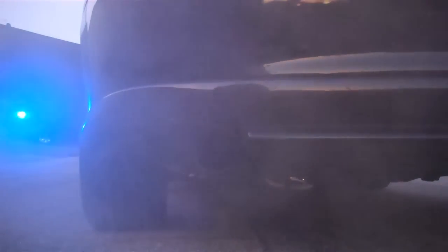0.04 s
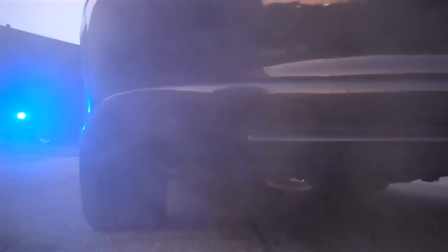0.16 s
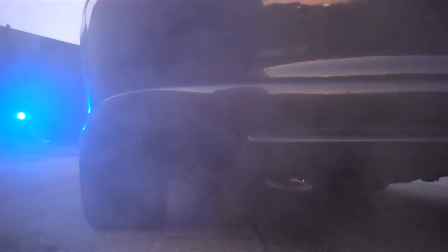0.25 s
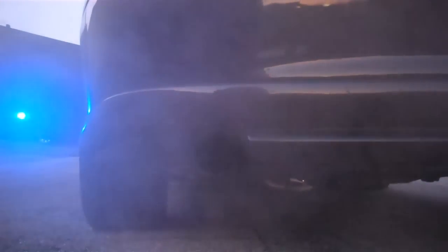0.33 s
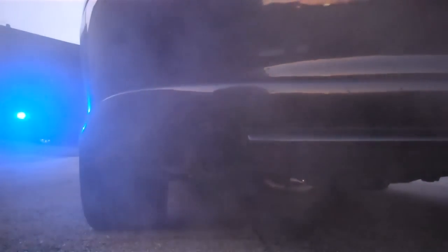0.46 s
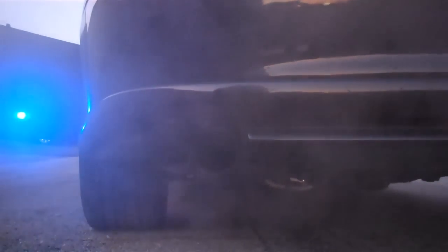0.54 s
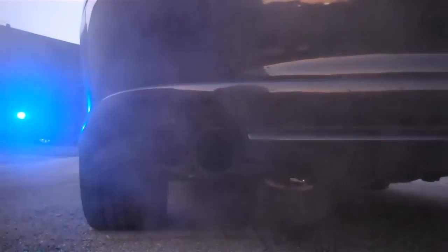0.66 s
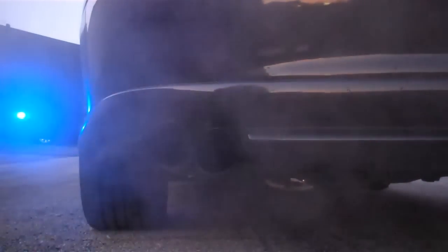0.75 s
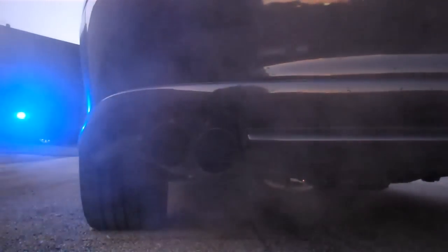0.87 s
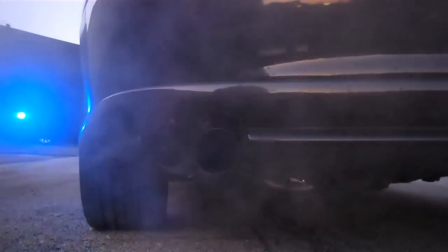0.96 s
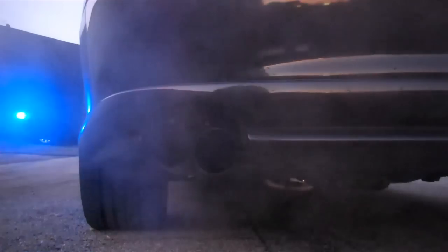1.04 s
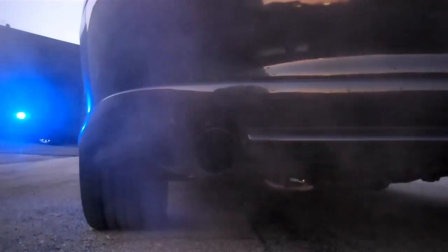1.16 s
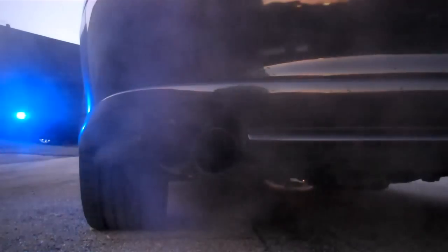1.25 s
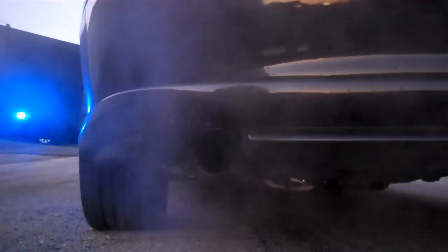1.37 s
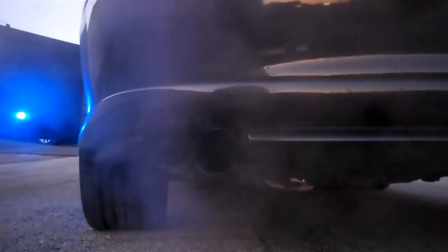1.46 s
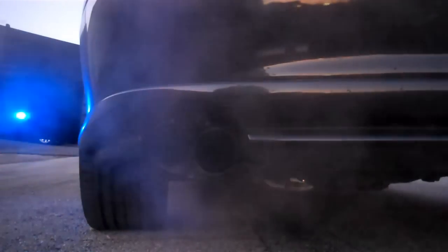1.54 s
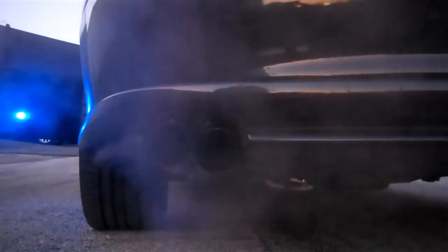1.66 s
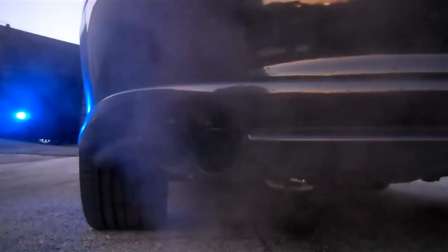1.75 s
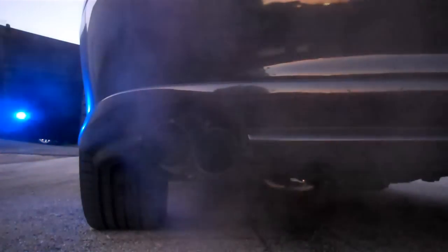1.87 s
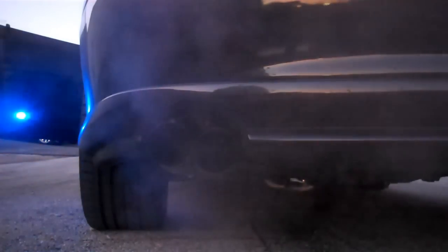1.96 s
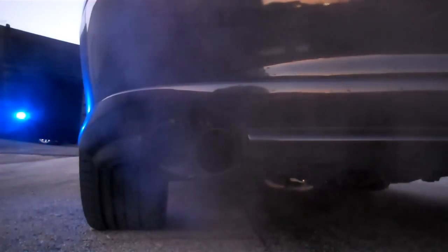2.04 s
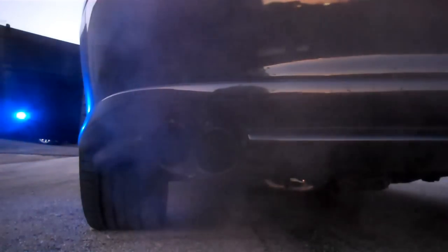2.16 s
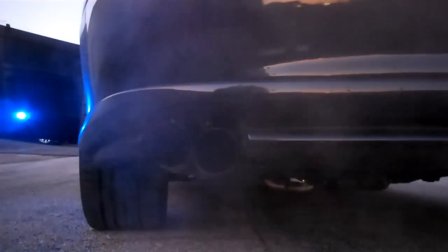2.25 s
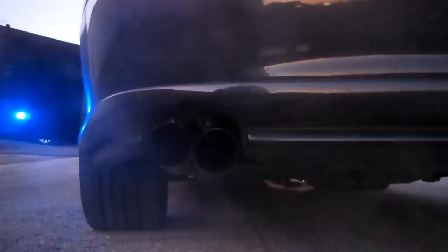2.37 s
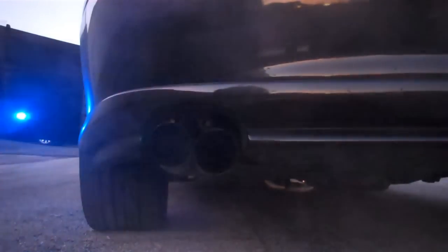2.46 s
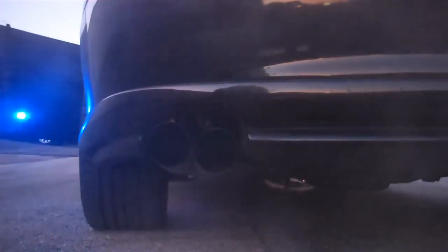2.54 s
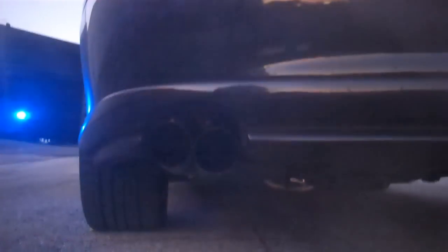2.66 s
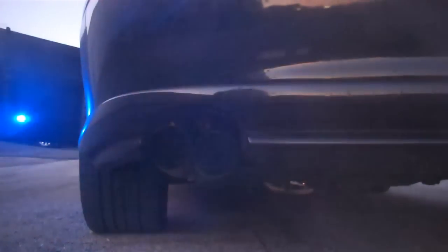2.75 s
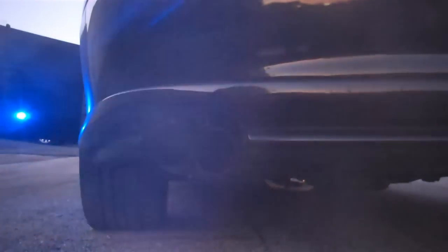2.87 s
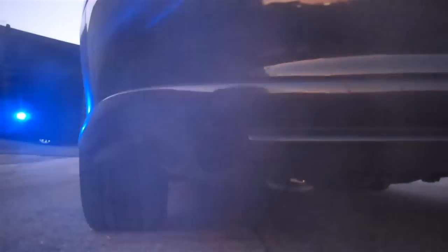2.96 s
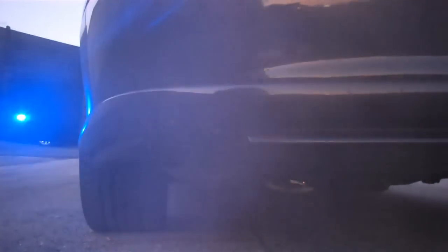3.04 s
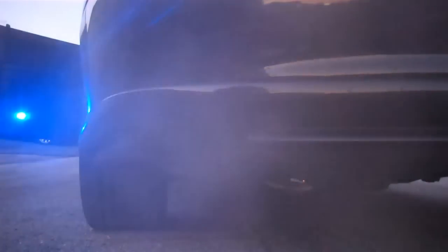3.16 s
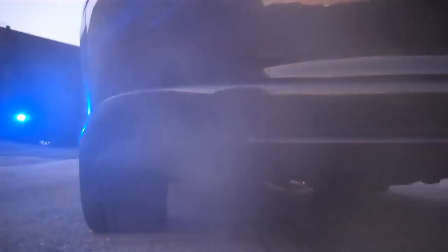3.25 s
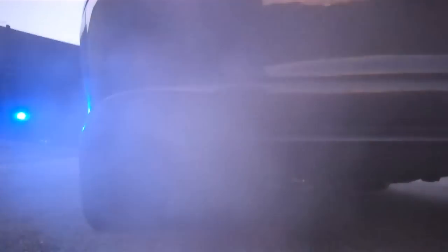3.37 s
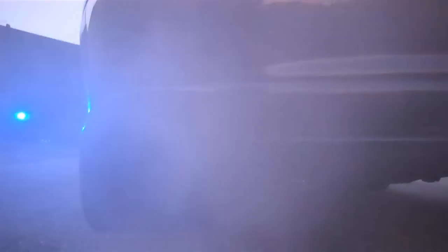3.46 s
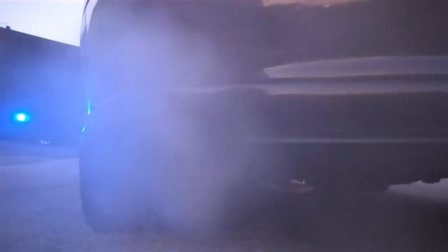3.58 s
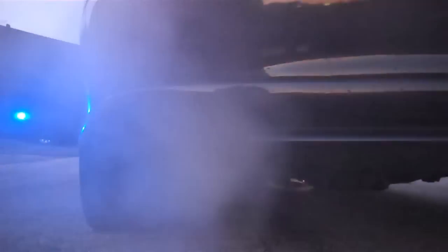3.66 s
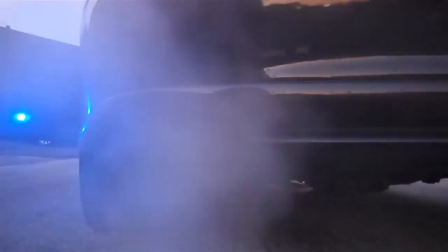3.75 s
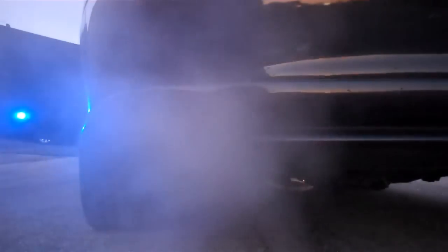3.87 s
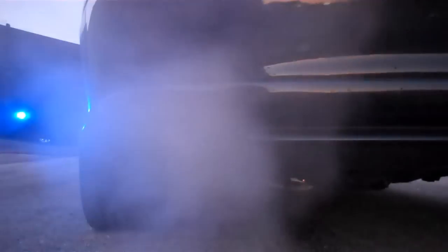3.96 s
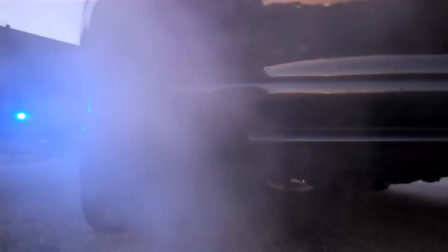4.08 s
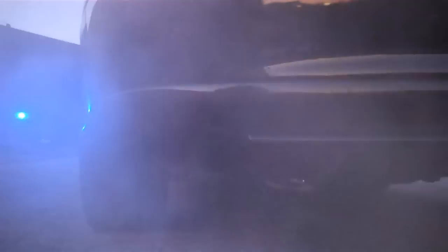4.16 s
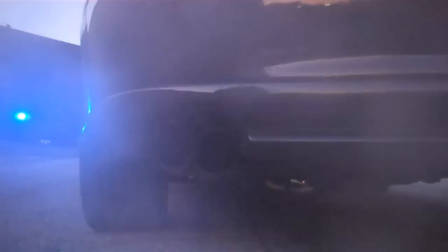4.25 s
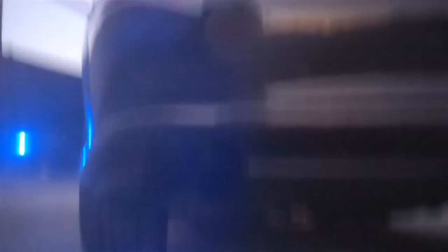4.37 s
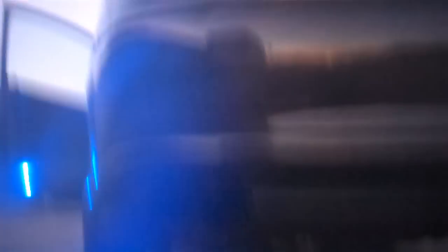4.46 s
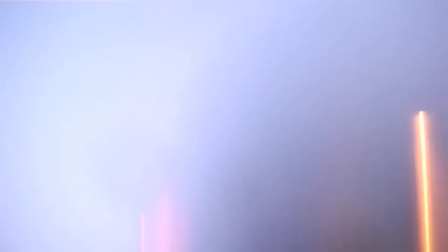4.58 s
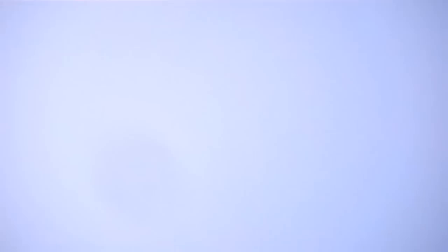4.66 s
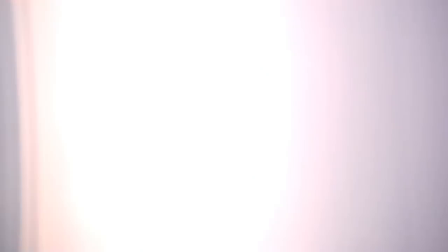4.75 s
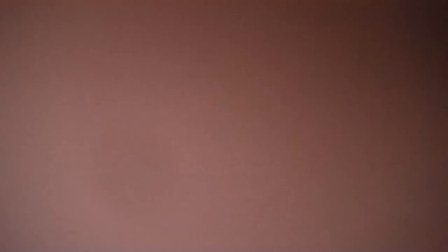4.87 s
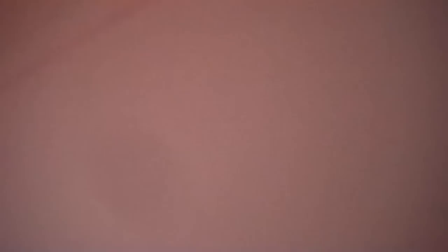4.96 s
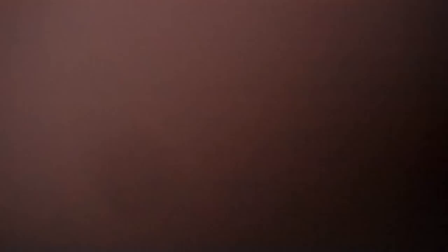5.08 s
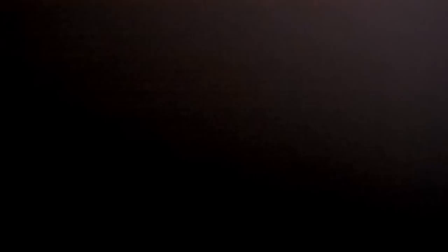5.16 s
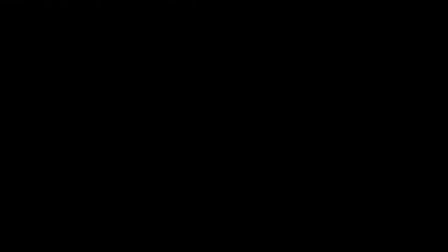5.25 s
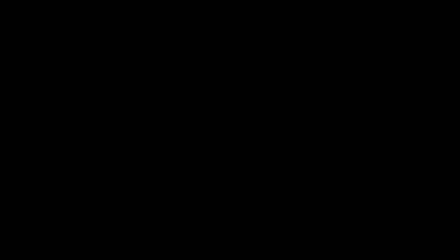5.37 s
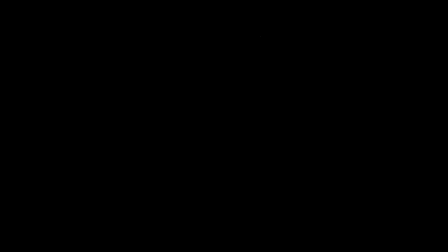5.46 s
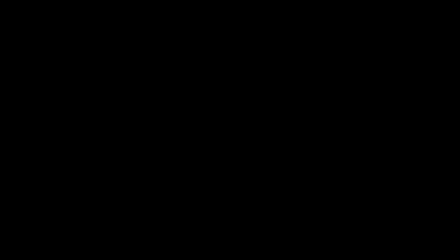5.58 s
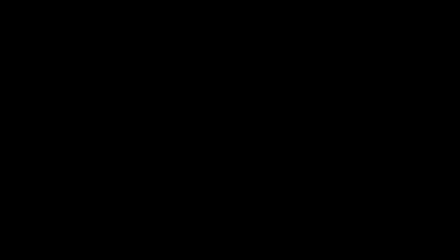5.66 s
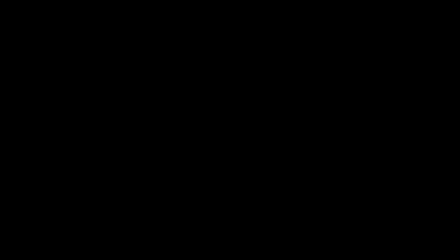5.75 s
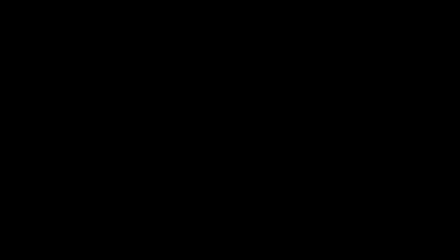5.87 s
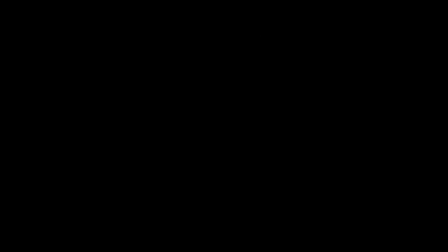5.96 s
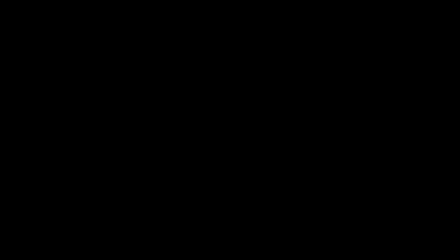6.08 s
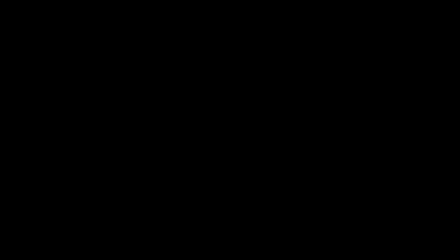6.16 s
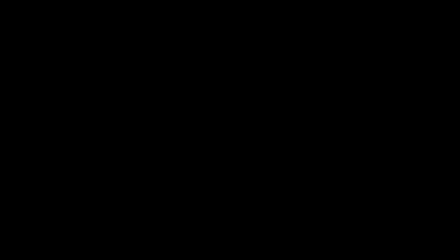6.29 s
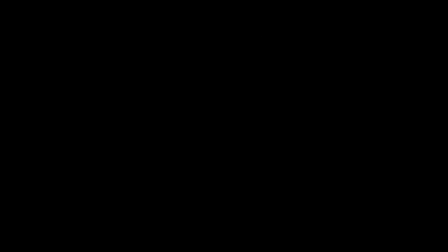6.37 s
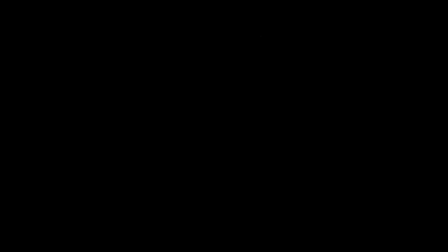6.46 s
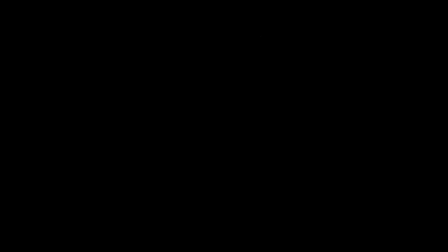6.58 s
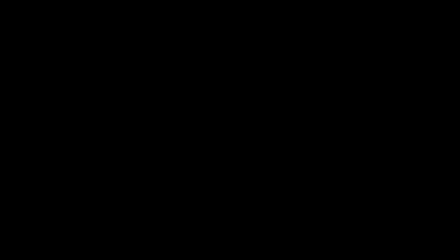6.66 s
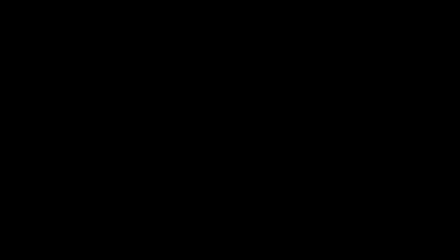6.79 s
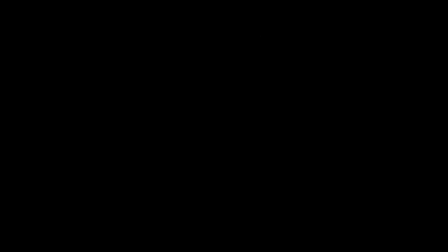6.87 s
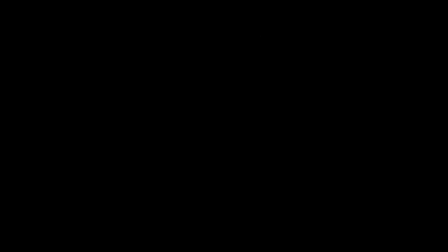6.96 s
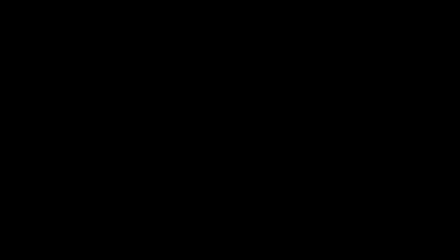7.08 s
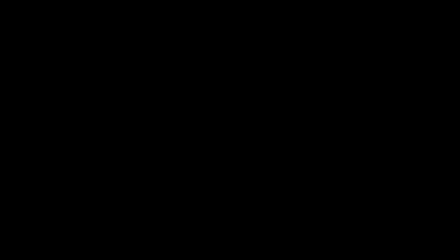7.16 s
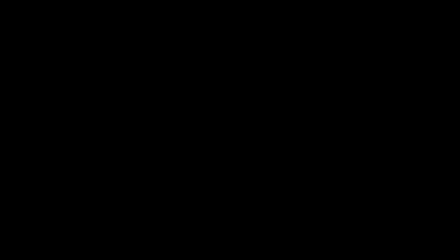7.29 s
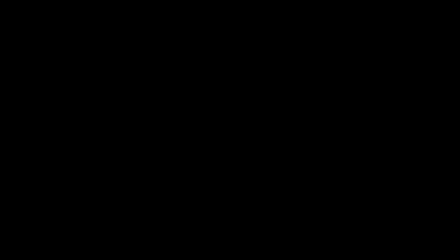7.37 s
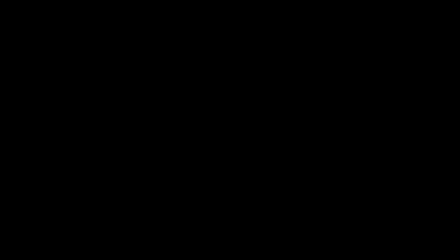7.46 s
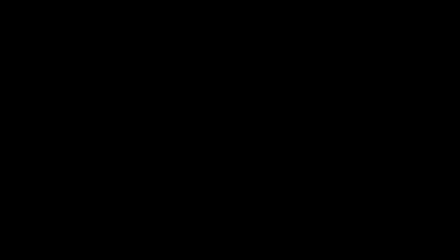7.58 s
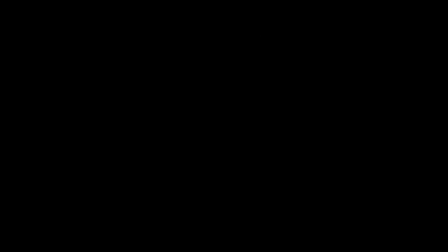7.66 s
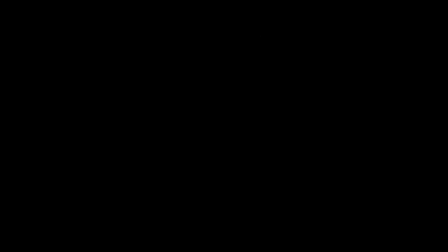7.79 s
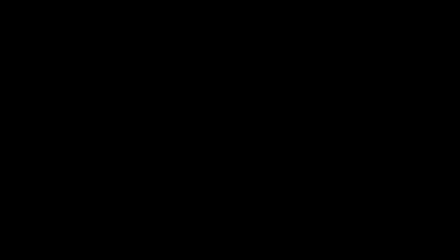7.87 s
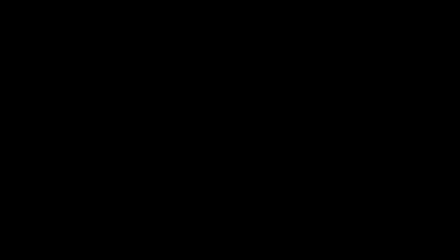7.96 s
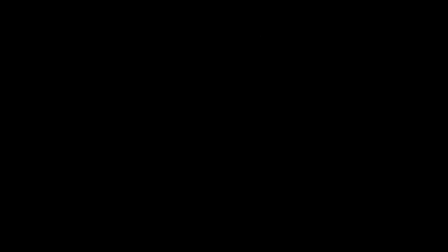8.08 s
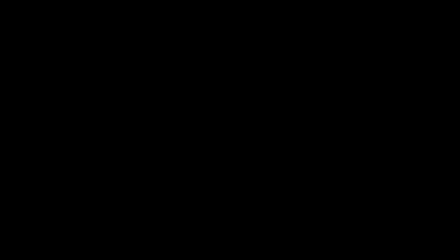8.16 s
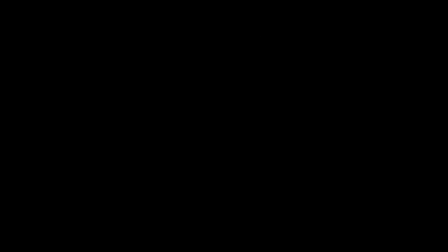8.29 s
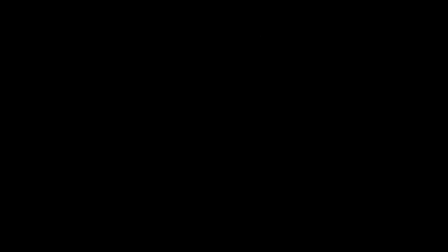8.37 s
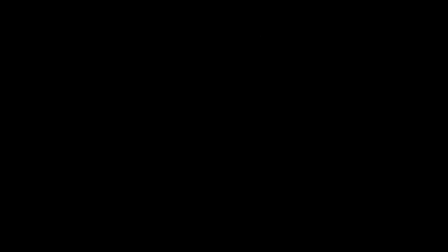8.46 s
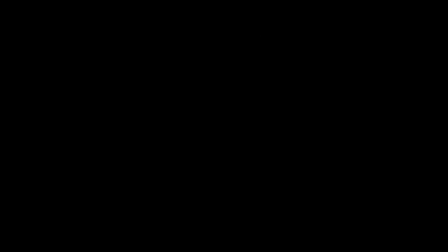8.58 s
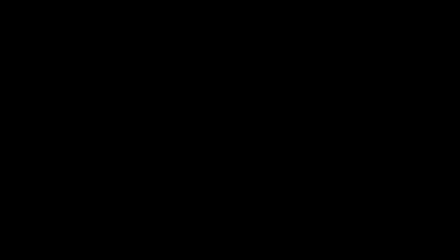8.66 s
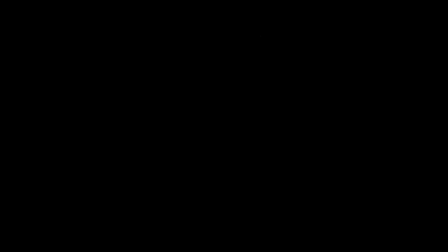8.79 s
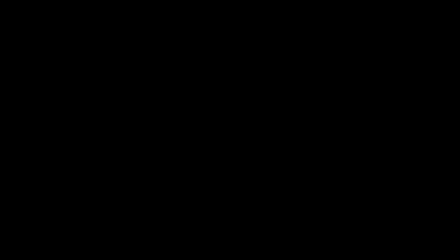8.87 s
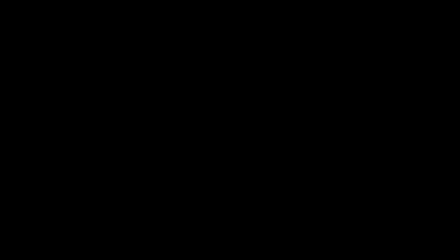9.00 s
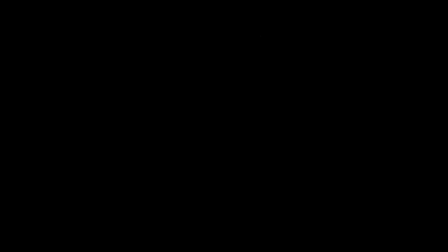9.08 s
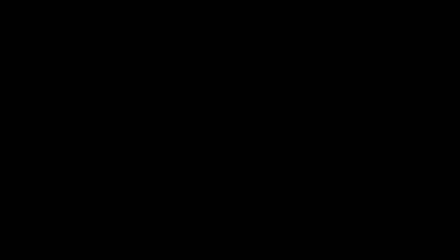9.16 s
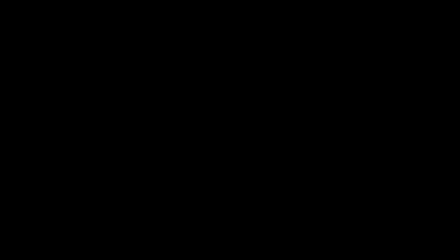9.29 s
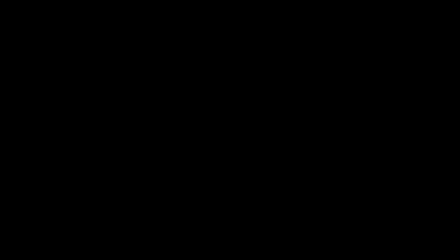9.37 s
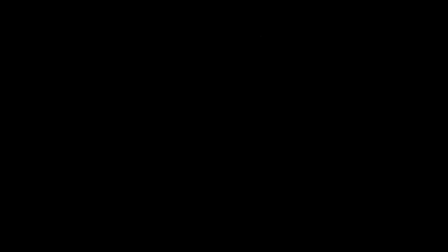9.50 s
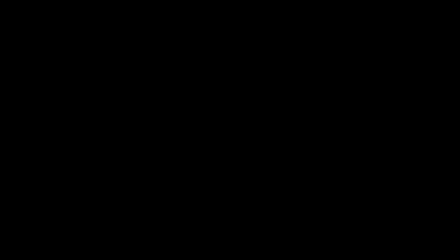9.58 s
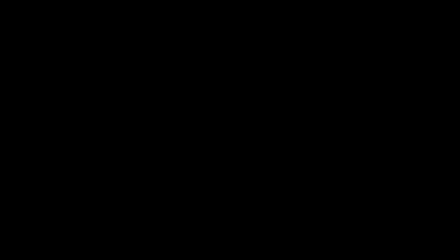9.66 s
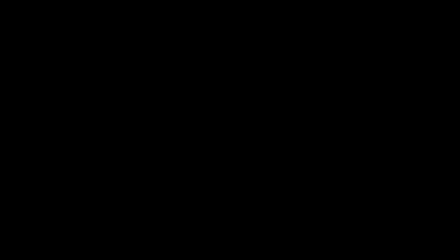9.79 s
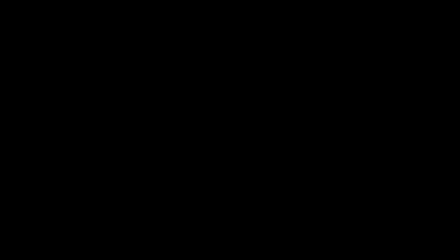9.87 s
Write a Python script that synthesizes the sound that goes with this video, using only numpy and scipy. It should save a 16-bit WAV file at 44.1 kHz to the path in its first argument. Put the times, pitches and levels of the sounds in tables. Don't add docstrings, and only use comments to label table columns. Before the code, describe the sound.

Heard close behind a car's tailpipes outdoors, a V8 idles deeply with breathy hiss and rapid belt chirps. A short blip falls back with pops, then two strong revs climb into a pitched rasp. Fingers scrape and knock the hand-held camera as it turns away and is half covered, dulling the hiss. A long, lumpy, popping coast-down ends in a quieter low idle.

```python
import sys
import numpy as np
from scipy import signal
from scipy.fft import rfft, irfft, next_fast_len
from scipy.io import wavfile
from scipy.ndimage import uniform_filter1d

SR = 44100
rng = np.random.default_rng(int(sys.argv[2]) if len(sys.argv) > 2 else 0)


def volts_from_db(level):
    exponent = np.asarray(level, float) / 20
    return 10 ** exponent


def dump(signal):
    limited = np.clip(np.atleast_2d(signal).T, -1, 1)
    pcm = np.round(limited * 32767).astype(np.int16)
    wavfile.write(sys.argv[1], SR, pcm)


N = 437913

# hz, correlation
ALIKE = [(60, 0.5), (130, 0.98), (290, 1.0), (630, 1), (1390, 1), (3050, 0.79), (6700, 0.45), (14700, 0.0)]
IDLE_HZ = 6.2
LUMPY_FULL_HZ = 18


def unit(x):
    return x / np.sqrt(np.mean(x ** 2) + 1e-20)


def along(points, hz):
    f, v = np.transpose(points)
    return np.interp(np.log(hz + 1), np.log(f + 1), v)


def curves(*tables):
    s, *cols = np.vstack(tables).T
    return [np.interp(np.arange(N) / SR, s, c) for c in cols]


def coloured(x, points):
    m = 2 * next_fast_len(N // 2 + SR // 4)
    gain = volts_from_db(along(points, np.fft.rfftfreq(m, 1 / SR)))
    cep = irfft(np.log(gain + 1e-6), m)
    cep[1:m // 2] *= 2
    cep[m // 2 + 1:] = 0
    return irfft(rfft(x, m) * np.exp(rfft(cep)), m)[..., :N]


def rush(spectrum, alike, lean=1):
    # hz, left_minus_right_db
    lean_points = [(60, 2), (110, -0.5), (200, -9), (380, -0.5), (690, 0), (1280, -1), (2350, 0.5),
                   (4330, -4.5), (7980, 3.5), (14700, 34)]
    hz = np.fft.rfftfreq(N, 1 / SR)
    turn = np.arccos(np.clip(along(alike, hz), -1, 1)) / 2
    a, b = rfft(rng.standard_normal((2, N))) * volts_from_db(along(spectrum, hz))
    mid, side = a * np.cos(turn), b * np.sin(turn)
    tilt = volts_from_db(lean * along(lean_points, hz) / 2)
    return unit(irfft([(mid + side) * tilt, (mid - side) / tilt], N))


def bursts(events, spectrum, rise, t60):
    out, t = np.zeros((2, N + SR)), np.arange(SR // 10) / SR
    for s, db in events:
        out[:, round(s * SR):][:, :len(t)] += volts_from_db(db - 60 * t / t60) * (1 - np.exp(-t / rise))
    return out[:, :N] * rush(spectrum, ALIKE)


def speed():
    # start_s, four_stroke_cycle_hz
    speed_points = [(1.8, 6.6555), (2, 7.31), (2.35, 14.21), (2.52, 18.9), (3.46, 11.68), (3.92, 9.25),
                    (4.06, 10.18), (4.23, 17.58), (4.48, 34.32), (4.59, 37.6), (5.17, 29.5), (5.39, 39.9),
                    (5.5, 44.04), (5.58, 45.57), (5.75, 43.92), (8.35, 9.84), (8.9, 6.6), (9.9, 4.9)]
    friction_hz = 20
    s, hz = np.transpose(speed_points)
    return np.exp(np.interp(np.arange(N) / SR, s, np.log(hz + friction_hz))) - friction_hz


def fast(cycle_hz):
    return np.clip((cycle_hz - 20) / 8, 0, 1)


def whine():
    # pitch_hz, level_db
    electric = [(11806, -66.5)]
    # pitch_hz, level_db
    drive = [(1513, -51.5), (1615, -52), (1782, -73)]
    (hz, db), t = electric[0], np.arange(N) / SR
    thin = volts_from_db(db - 8) * np.clip((t - 8.6) / .3, 0, 1) * np.sin(2 * np.pi * hz * t)

    def drift():
        return np.interp(t, np.arange(400) / 40, rng.standard_normal(400))

    whir = sum(volts_from_db(db + 5.5 + 4.9 * drift()) * np.sin(2 * np.pi * hz * t + 0.31 * drift())
               for hz, db in drive)
    return thin + whir * np.clip((2.1 - t) / 0.27, 0, 1)


def ticks():
    # start_s, peak_db
    tick_events = [(9.5083, -26), (9.5516, -32), (9.6225, -24), (9.6889, -31)]
    spectrum = [(1000, -52), (2000, 12), (4500, 8), (6500, -23), (9000, -70)]
    return bursts(tick_events, spectrum, rise=0.0022, t60=0.045)


def clicks():
    # start_s, peak_db
    click_events = [(4.3514, -33), (4.3695, -29), (4.3874, -28), (4.4677, -27), (4.4844, -28),
                    (4.4897, -25), (4.4984, -27), (4.6309, -34)]
    spectrum = [(5000, -40), (7500, 7), (11500, -12), (14000, -25)]
    return volts_from_db(0.5) * bursts(click_events, spectrum, rise=0.0006, t60=0.019)


def handling():
    # start_s, peak_db, thud_db, left_minus_right_db, length_ms
    knocks = [(4.2193, -32, -11.5, 8.5, 4.8), (4.3539, -19, -9, -7, 8.4), (4.401, -13.5, -7.5, -5.5, 7.1),
              (4.527, -18.5, 15.5, -7, 8.4), (4.6482, -23, -7.5, -3.5, 16), (4.839, -11, 4.5, -4.5, 14),
              (4.8517, 1.5, 11, -6.5, 9), (4.8852, -15.5, -3.5, 1.5, 3), (5.0645, -6.5, -27, -5, 11),
              (5.13, -11.5, -29, 5.5, 27.5), (5.1725, -14, 0.5, 6, 11), (5.2216, -16.5, -16.5, -3.5, 2),
              (5.259, -23, -7.5, 0.5, 17), (5.291, -22.5, -4.5, 3, 6.8), (7.464, -14, 23, 4, 7.5)]
    # hz, db_per_hz
    shell = [(260, -29.5), (450, -4), (1170, -12), (1550, -15), (1790, -15.5), (4030, -28), (5330, -24.5),
             (8290, -33), (13700, -52.5), (15200, -62)]
    thud_hz = 230
    scratch, thud, t = np.zeros((2, N + SR)), np.zeros(N + SR), np.arange(SR // 10) / SR
    for s, db, thud_db, pan_db, ms in knocks:
        start = round(s * SR)
        shape = np.exp(-(t * 1000 / ms) ** 3) + 1.7 * np.exp(-t / 0.00099) + volts_from_db(-12.5 - 60 * t / 0.17)
        grit = rng.standard_normal(len(t)) + 2.0 * rng.standard_normal((2, len(t)))
        pan = np.array([[pan_db], [-pan_db]]) / 2
        scratch[:, start:][:, :len(t)] += volts_from_db(db + pan) * shape * grit
        thud[start:][:len(t)] += volts_from_db(db + thud_db - 60 * t / 0.034) * np.sin(2 * np.pi * thud_hz * t)
    return volts_from_db(9.5) * coloured(scratch[:, :N], shell) + thud[:N]


def buffet():
    # peak_s, peak_db
    shakes = [(2.24, -43.5), (2.929, -23), (3.3, -33.5), (3.51, -28.5), (3.8, -36), (4.249, -27),
              (4.44, -19.5), (4.579, -24.5), (4.869, -39.5), (5.25, -40), (6.88, -57), (7.3, -40),
              (7.65, -26.5), (8.021, -41), (8.4, -41.5), (9.37, -36), (9.68, -46)]
    floor_db, rise_db_s, fall_db_s = -43.5, 116, 106.5
    spectrum = [(20, -23.0), (38, 16), (50, 16.0), (80, 7), (120, -76.5)]
    t = np.arange(N) / SR
    lumps = sum(volts_from_db(db - np.where(t < s, rise_db_s * (s - t), fall_db_s * (t - s))) for s, db in shakes)
    floor = volts_from_db(floor_db - 8.8 * fast(speed()))
    return (lumps + floor) * rush(spectrum, [(40, 0.31)], lean=0)


def slips():
    # first_s, last_s, slips_per_cycle, swell_in_s
    bouts = [
        (.0185, 2.13, 2.086, .01),
        (3.617, 4, 2.04, .35),
        (8.645, 9.86, 1.9, .16),
    ]
    strong_db = [-27, -32.5, -43]
    swell_db = [-3, 7, 10]
    weaker_db = [6.5, 8, -2]
    t, turns, rows = np.arange(N) / SR, np.cumsum(speed()) / SR, []
    for (first, last, per_cycle, swell), db, below_db, weak_db in zip(bouts, strong_db, swell_db, weaker_db):
        begin, end = np.interp([first, last], t, turns)
        k = np.arange(int((end - begin) * per_cycle) + 1)
        s = np.interp(begin + k / per_cycle, turns, t)
        luck = rng.standard_normal((len(k), 3))
        level_db = db - weak_db * (k % 2 == 0) + 1.3 * luck[:, 0]
        level_db = level_db - below_db * np.clip(1 - (s - first) / swell, 0, 1)
        rows += zip(s + 0.006 * luck[:, 2], level_db, 8350 + 200 * luck[:, 1])
    return rows


def belt():
    spread_hz, glide_hz, length_s = 680, 400, .06
    tone_gain = np.array([[1.0, 0.59, 0.081, 1.0], [0.19, -0.1, 0.079, 0.28]])
    t, out = np.arange(int(length_s * SR)) / SR, np.zeros((2, N + SR))
    for s, db, pitch_hz in slips():
        offset_hz = spread_hz * np.array([[0], [1], [2], [-1]]) * rng.uniform(0.205, 1.0, (4, 1))
        hz = pitch_hz + glide_hz * (t / length_s - .5) + offset_hz
        scrape = uniform_filter1d(rng.standard_normal((4, len(t))), size=40)
        flutter = .6 + 5 * uniform_filter1d(scrape, size=25)
        chirp = np.hanning(len(t)) * flutter * np.sin(2 * np.pi * np.cumsum(hz, 1) / SR)
        out[:, max(round((s - .021) * SR), 0):][:, :len(t)] += volts_from_db(db) * tone_gain @ chirp
    return out[:, :N]


def jets():
    # start_s, end_s, level_db, fade_s
    openings = [(2.086, 2.229, -33, .006), (3.217, 3.295, -39.5, 0.016), (4.012, 4.122, -26.5, 0.015),
                (4.434, 4.53, -45, 0.022), (4.619, 4.682, -34.5, 0.048), (5.57, 6.198, -44, 0.37),
                (6.1, 6.76, -45, 0.35)]
    # hz, db_per_hz
    jet_spectrum = [(800, -30), (2000, -12), (7000, 8.5), (10000, -3), (14300, -17.5)]
    rise_s, t = 0.019, np.arange(N) / SR
    swell = 0
    for s, end, db, fade in openings:
        ramp = np.minimum((t - s) / max(rise_s, fade / 2), (end - t) / fade)
        swell = swell + volts_from_db(db) * np.clip(ramp, 0, 1)
    return swell * rush(jet_spectrum, ALIKE, lean=.3)


def pops():
    # start_s, peak_db
    pop_events = [(2.386, -30), (2.439, -28), (2.693, -25), (2.715, -26), (2.764, -29), (2.797, -17),
                  (2.841, -13.5), (3.041, -29), (3.085, -18), (3.122, -31), (3.402, -27.5), (4.167, -17.5),
                  (4.52, -36.5), (5.605, -14.5), (5.635, -17), (5.66, -24), (6.835, -13), (6.873, -17.5),
                  (6.91, -19), (6.951, -18.5), (6.997, -26.5), (7.101, -17.5), (7.146, -19.5),
                  (7.213, -19.5), (7.238, -21), (7.402, -18.5), (7.608, -19.5), (7.655, -15.5),
                  (7.683, -25), (7.792, -18.5), (8.258, -27.5), (8.308, -23), (8.359, -25)]
    spectrum = [(150, -33), (280, 11.5), (700, 3), (900, -8), (1100, -35), (3000, -80)]
    return bursts(pop_events, spectrum, rise=0.0015, t60=0.15)


def misfire(cycle_hz):
    lumpy_ends_hz, lumpy_begins_hz, settle_s = 7.5, 24, .08
    depth = np.clip((lumpy_begins_hz - cycle_hz) / (lumpy_begins_hz - LUMPY_FULL_HZ), 0, 1)
    coasting = (np.gradient(cycle_hz) < 0) * (cycle_hz > lumpy_ends_hz) * depth
    rough = .27 * np.roll(coasting, round(settle_s * SR)) + .16 * (cycle_hz < IDLE_HZ)
    return .04 * np.sqrt(IDLE_HZ / cycle_hz) + uniform_filter1d(rough, size=SR // 6)


def pulling(cycle_hz, full_hz_s, size):
    return uniform_filter1d(np.clip(np.gradient(cycle_hz) * SR / full_hz_s, 0, 1), size=size)


def levels(cycle_hz):
    # start_s, exhaust_db, gas_flow_db
    engine = [(0, -14.5, -28), (2.05, -14, -27), (2.17, -8, -25), (2.36, -8, -38), (2.56, -11, -38),
              (2.74, -12, -36), (3.7, -12, -33), (3.96, -15, -28.5), (4.15, -4, -23), (4.2, -11.5, -33),
              (4.45, -12.5, -32.5), (4.65, -11, -36), (5.2, -10, -37.5), (5.73, -13.5, -33.5),
              (7, -11, -37.5), (8.5, -11.5, -38.5), (9.05, -25, -33), (9.93, -24, -35)]
    # centre_s, swell_db
    surges = [(2.03, -5.5), (2.171, -0.5), (2.62, 3.5), (2.944, 6.5), (4.078, 4), (3.12, 8), (3.5, 3.5),
              (3.649, -6), (3.87, 3), (3.92, -5), (6.1, 5), (6.72, -3), (6.871, 2.5), (6.97, -3.5),
              (7.18, -3), (7.47, 5.5), (7.721, 3), (7.831, -3.5), (8.061, 1.5), (8.26, 0), (8.341, 4.5),
              (8.481, 0.5), (8.552, 0), (8.59, 5), (8.77, 2), (8.84, -4), (9.28, -5), (9.58, -4),
              (9.66, -2.5), (9.75, -3), (9.81, -3), (8.93, 0), (9.04, 5), (9.1, -8.5), (9.17, -1),
              (9.45, 2), (9.9, 7.5)]
    # start_s, drop_db, recovery_s
    ducks = [(2.224, 9, 0.05), (2.369, 13.5, 0.37), (2.942, 7, 0.08), (3.287, 5, 0.15),
             (4.154, 12.5, 0.082), (4.54, 9.5, 0.14), (5.092, 6, 0.087), (5.151, 17, 0.078),
             (5.6, 3.5, 0.052), (5.675, 7, 0.041)]
    surge_s, duck_s = 0.03, .006
    lope_db, lope_turn, lope_gone_hz = .1, .2, 9
    rasp_db, rasp_pull_db, rasp_grows_db, rasp_full_hz = 3, 3.5, 15.5, 33.8
    t, (db, flow_db) = np.arange(N) / SR, curves(engine)
    slow = np.clip((lope_gone_hz - cycle_hz) / 2, 0, 1) * np.clip(2 * (cycle_hz - IDLE_HZ), 0, 1)
    pull = pulling(cycle_hz, 49.4, SR // 20)
    swing_db = lope_db * slow * np.cos(2 * np.pi * (np.cumsum(cycle_hz) / SR + lope_turn))
    surge_db = sum(swell_db * np.exp(-((t - s) / surge_s) ** 2) for s, swell_db in surges)
    duck_db = sum(drop_db * np.clip((t - s) / duck_s + .5, 0, 1) * np.clip(1 - (t - s) / back, 0, 1)
                  for s, drop_db, back in ducks)
    growth = np.clip((cycle_hz - IDLE_HZ) / (rasp_full_hz - IDLE_HZ), 0, 1)
    over_db = rasp_db + rasp_pull_db * pull + rasp_grows_db * growth
    return db + swing_db + surge_db - duck_db, flow_db + over_db - duck_db, flow_db - duck_db


def baffled(x, ripple_db=0):
    from_hz, band_hz, longest_s = 175, 35, .03
    hz, knots = np.fft.rfftfreq(N, 1 / SR), np.arange(from_hz, SR / 2, band_hz)
    detour_s = rng.uniform(0, longest_s, len(knots)) * (knots > knots[0])
    late = np.interp(hz, knots, detour_s)
    ripple = volts_from_db(ripple_db * np.interp(hz, knots, rng.standard_normal(len(knots))))
    return irfft(rfft(x) * ripple * np.exp(-2j * np.pi * np.cumsum(late) * hz[1]), N)


def thinned(x, cycle_hz):
    deep = irfft(rfft(x) / (1 + (np.fft.rfftfreq(N, 1 / SR) / 78) ** 8), N)
    return x - .7 * fast(cycle_hz) * deep


def evened(x, span):
    energy, n = np.cumsum(np.pad(x ** 2, (1, 0))), np.arange(N)
    a, b = np.clip(n - span, 0, N), np.clip(n + span, 0, N)
    power = uniform_filter1d((energy[b] - energy[a]) / (b - a), size=900)
    return x / np.sqrt(power + 1e-20)


def loaded(boom, cycle_hz, firings, cylinders):
    pull = pulling(cycle_hz, 18, SR // 6)
    share = np.abs(.6 * pull * np.interp(cycle_hz * cylinders, (65, 105, 190, 235), [0, 1, 1, 0]))
    return np.sqrt(1 - share) * boom + np.sqrt(2 * share) * np.cos(2 * np.pi * firings)


def bounced(x, ms, db):
    late = volts_from_db(db) * np.roll(x, round(ms * SR / 1000))
    return np.array([x + late, x - late])


def aimed(x, turned):
    lag_samples = 1.6 * (.5 - turned) * np.array([[1], [-1]])
    gain_db = 0.28 + (0.15 - 0.21 * turned) * np.array([[-1], [1]])
    return (x - lag_samples * np.gradient(x, axis=1)) * volts_from_db(gain_db)


def exhaust():
    # extra_strength, lag_firing_intervals, header_delay_ms
    cylinders = [(-.128, .62, .711), (.046, .686, .615), (-.527, .745, -.964), (.372, .759, -1.729),
                 (.412, .838, -1.121), (.183, .767, -1.197), (-2.124, .954, 1.746), (-.32, .735, -2.153)]
    # hz, gain_db
    pipe = [(25, -54), (55, -28), (85, -26), (108, -3.8), (124, -2.5), (142, -11.4), (165, -28), (188, -34),
            (213, -16.5), (248, -23), (285, -13), (315, -22), (350, -32), (430, -31), (2000, -120)]
    # hz, gain_db
    chamber = [(60, -60), (104, -14), (123, 0), (142, -16), (220, -55), (900, -120)]
    # hz, db_per_hz
    bark_spectrum = [(210, -92.5), (340, 5.5), (420, 5.5), (520, 4.5), (650, -4.5), (820, -3),
                     (1000, -10.5), (1350, -15), (1600, -19.5), (2200, -25), (4400, -120)]
    # hz, db_per_hz
    rasp_spectrum = [(210, -85.5), (350, 4), (400, 0.5), (472, 4), (804, -5), (1250, -20.5), (1560, -22),
                     (2000, -22.5), (2600, -25), (4400, -120)]
    # hz, db_per_hz
    hiss_spectrum = [(650, -18), (1100, -17), (1360, -6), (1490, -3.5), (2310, -5), (2740, -2), (4250, -2),
                     (5000, -3), (7920, 0), (8730, -9.5), (9610, -19.5), (14300, -42.5)]
    # hz, db_per_hz
    muffled = [(650, -32), (1100, 3), (1240, -16.5), (1390, 2.5), (2190, 0), (2410, -0.5), (2600, 3),
               (3150, -0.5), (3780, 5.5), (4630, -0.5), (6130, 4), (9010, -10.5), (10400, -28),
               (14300, -35)]
    # hz, correlation
    shaded = [(60, -0.29), (240, 1), (940, 0.73), (3720, 0.59), (14700, -0.99)]
    cycle_hz, n = speed(), np.arange(N)
    scatter = misfire(cycle_hz)
    boom_db, rasp_db, hiss_db = levels(cycle_hz)

    firing_hz = cycle_hz * len(cylinders)
    firings = np.cumsum(firing_hz) / SR + 0.302
    at = np.interp(np.arange(1, int(firings[-1])), firings, n)
    near = at.astype(int)
    extra, lag, late_ms = np.array(cylinders)[np.arange(len(at)) % len(cylinders)].T
    luck = rng.standard_normal((len(at), 2))
    rough = scatter[near]
    size = 1 - rough + extra + rough * luck[:, 0]
    late = (lag + rough * luck[:, 1] / 7) * SR / firing_hz[near] + late_ms * SR / 1000
    place = np.clip(at + late, 0, N - 2)
    whole, part = place.astype(int), place % 1

    def train(w):
        return np.bincount(whole, w * (1 - part), N) + np.bincount(whole + 1, w * part, N)

    wave = 2 * firing_hz / SR * (cycle_hz / 10.5) * (1 - 1.5 * scatter) * np.cos(2 * np.pi * firings)
    half_cycle = np.clip(SR / cycle_hz, 0, .15 * SR).astype(int) // 2
    kicks = rough * luck[:, 0] * np.minimum(1, LUMPY_FULL_HZ / cycle_hz[near]) ** 2
    drone = 2.4 * coloured(train(kicks), chamber)
    boom = thinned(baffled(coloured(train(size) + wave, pipe)), cycle_hz) + drone
    boom = loaded(evened(boom, half_cycle), cycle_hz, firings, len(cylinders))
    boom = bounced(boom, ms=2.57, db=-21.0)

    uneven = np.clip(size - .85, -.6, .6) + .04 * luck[:, 1]
    bark = evened(baffled(coloured(train(uneven), bark_spectrum), ripple_db=3), half_cycle)
    bark = bounced(bark, ms=1.7, db=-4)

    turned = np.clip((n / SR - 4.2) / 1.0, 0, 1)

    def swing(facing, away):
        return np.sqrt(1 - turned) * rush(facing, ALIKE) + np.sqrt(turned) * rush(away, shaded, lean=0.51)

    pitched = np.clip((cycle_hz - 14) / 16, .03, .87)
    puff = np.interp(n, near, np.abs(size)) * np.exp(-1.5 * (firings % 1))
    breath = unit((1.4 + puff) * swing(rasp_spectrum, rasp_spectrum))
    rasp = volts_from_db(rasp_db - 5.0) * (np.sqrt(1 - pitched) * breath + np.sqrt(pitched) * bark)
    gusts = np.interp(n, np.arange(300) * SR / 25, rng.standard_normal(300))
    hiss = volts_from_db(hiss_db - 5.0 + 0.71 * gusts) * unit((4 + puff) * swing(hiss_spectrum, muffled))
    pipes = volts_from_db(boom_db) * (aimed(boom, turned) + volts_from_db(-22 - 11 * pitched) * swing(pipe, pipe))
    return pipes + rasp + hiss


def scene():
    camera = handling() + ticks() + clicks() + whine()
    return camera + buffet() + belt() + jets() + pops() + exhaust()


def roll_off(x):
    return signal.sosfilt(signal.butter(12, 15310, fs=SR, output="sos"), x)


def record(dry):
    band = [(8, -40), (30, 0), (14200, 0), (14400, -21), (15250, -23), (15350, -110)]  # hz, gain_db
    overflow_s, overflow_ms = 7.465, .2
    t_ms = (np.arange(N) / SR - overflow_s) * 1000
    held = dry / (1 + np.abs(dry) ** 8) ** (1 / 8)
    left = np.where((t_ms > 0) & (t_ms < overflow_ms), -.8, held[0])
    wrapped = np.array([left, held[1]])
    mix = irfft(rfft(wrapped) * volts_from_db(along(band, np.fft.rfftfreq(N, 1 / SR))), N)
    return roll_off(mix)


dry = scene()
out = record(dry)
dump(out)
```